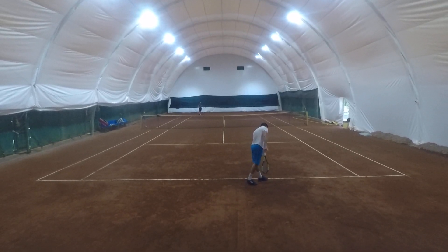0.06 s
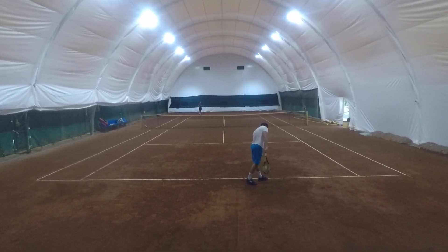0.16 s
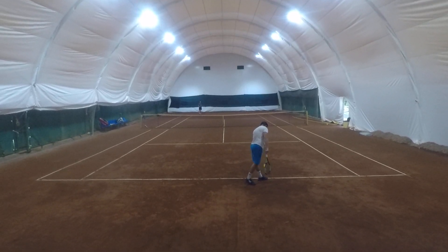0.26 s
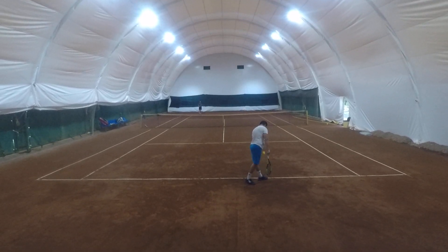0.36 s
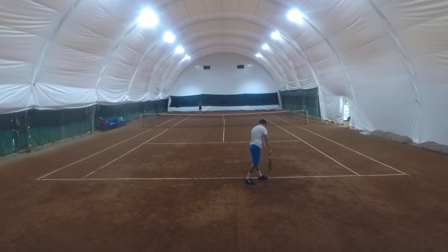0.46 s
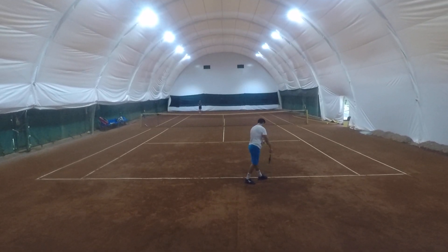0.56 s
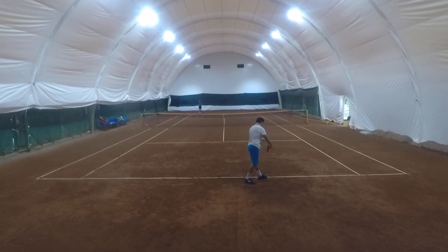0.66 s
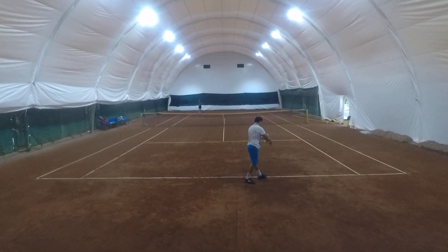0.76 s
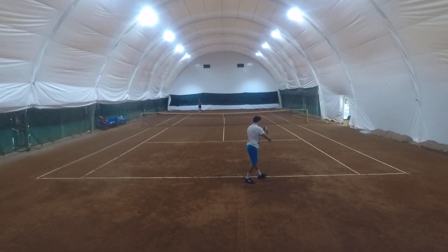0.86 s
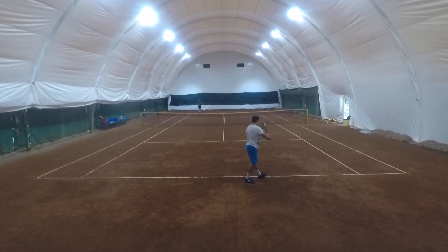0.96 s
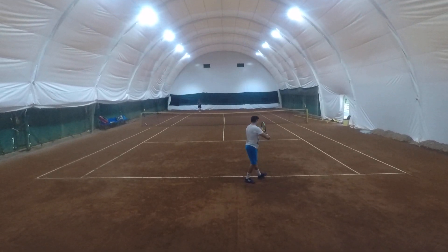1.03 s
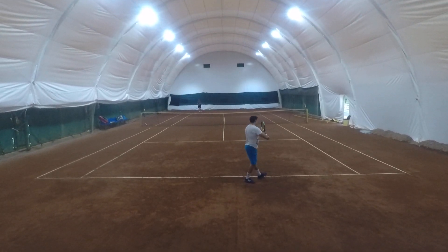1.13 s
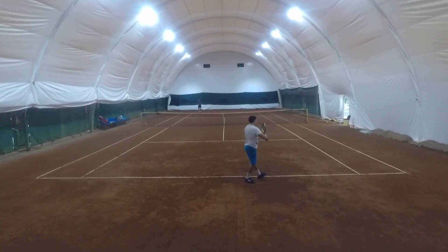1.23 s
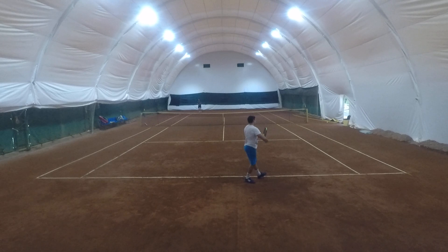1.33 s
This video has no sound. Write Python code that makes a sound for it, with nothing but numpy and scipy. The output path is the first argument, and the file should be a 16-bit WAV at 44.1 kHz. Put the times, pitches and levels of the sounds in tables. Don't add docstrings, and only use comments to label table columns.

```python
import sys
import numpy as np
from scipy import signal
from scipy.fft import rfft, irfft, next_fast_len
from scipy.io import wavfile
from scipy.ndimage import uniform_filter1d, map_coordinates

SR = 44100
rng = np.random.default_rng(int(sys.argv[2]) if len(sys.argv) > 2 else 0)


def wav_out(sig):
    wavfile.write(sys.argv[1], SR, np.round(np.clip(np.atleast_2d(sig).T, -1, 1) * 32767).astype(np.int16))


def gain_from_db(level_db):
    decades = np.asarray(level_db, float) / 20
    return 10 ** decades


N = 61740

# t/s, level/dB
HALL_RUSH_LEVEL = [
    (0.0, -40.5),
    (0.526, -40),
    (0.954, -44),
    (1.4, -49.5),
]
# f/Hz, level/dB
RUSH_MID = [(59, -37), (100, -42), (119, -4.5), (237, -1.5), (260, -6.5), (299, -7), (657, -16.5),
            (1040, -8), (4000, -38.5), (5200, -52), (8800, -120)]
RUSH_SIDE = [(59, -49), (100, -8), (124, -11.5), (230, -4.5), (468, -15), (521, -6.5), (699, -15),
             (1010, -7), (4000, -43.5), (5200, -74), (8800, -120)]
# f/Hz, level/dB
HISS_SPECTRUM = [(1470, -27), (2500, -2.5), (4400, -8.5), (4600, -5.5), (5870, -3.5), (6470, -2.5),
                 (8710, -4.5), (13800, -16.5), (14800, -43)]
# f/Hz, level/dB
RUMBLE_SPECTRUM = [(15, -4.5), (40, -4), (70, -7.5), (100, -11.5), (130, -41)]
# t/s, level/dB
WIND_FILTER = [
    (0, 19),
    (.04, -25),
    (.49, -24),
    (.56, -1),
    (.64, 12.5),
    (.75, 13),
]
# t/s, length/s, level/dB, boom/dB, brightness/dB
ECHO_GROUPS = [(0.176, 0.024, -39.5, 2.5, -1), (0.262, 0.013, -42.5, 7.5, 9), (0.303, 0.032, -36, 12, 9),
               (0.342, 0.023, -32.5, 1, 1.5), (0.361, 0.018, -32, 6.5, 3), (0.376, .014, -38, -7, 5),
               (0.415, 0.011, -31.5, 12, 2.5), (0.437, 0.031, -33, 2.5, 3.5),
               (0.499, 0.015, -34.5, 9.5, 9.5), (0.512, 0.021, -33.5, 3, -5),
               (0.523, 0.014, -23, 9.5, 10.5), (0.549, 0.015, -27.5, 3, 3), (0.57, 0.011, -28, 3, 10.5),
               (0.587, 0.013, -32.5, -9, 7), (0.614, 0.031, -33.5, 7.5, 6.5), (0.649, 0.02, -33, 3, 3),
               (0.679, 0.009, -37, 8, 0), (0.712, 0.026, -41, 8.5, 6.5), (0.738, 0.024, -42, 6.5, 7.5),
               (0.786, 0.017, -44.5, 8, 4.5), (0.823, 0.042, -44.5, 7, 4), (0.933, 0.089, -64, 16.5, 16)]
# f/Hz, width/Hz
RACKET_MODES = [(440, 24), (500, 5.3), (540, 3.3), (985, 69), (1165, 35), (1440, 160), (1525, 17),
                (2270, 220), (2450, 75), (3090, 140), (6200, 740)]
# f/Hz, level/dB
CRACK_MID = [(150, -35), (250, -13.5), (443, 0.5), (747, -15.5), (1470, -19.5), (2430, -27), (4680, -38.5),
             (6450, -44), (14000, -50)]
CRACK_SIDE = [(150, -32.5), (250, 5), (311, -8), (436, -1.5), (642, -4.5), (1370, -15.5), (3340, -43.5),
              (5930, -50), (14000, -60)]
# f/Hz, width/Hz, level/dB
BOOM_MODES = [(154.3, 37, 6), (223, 130, -9.5), (230, 8, -31)]
# f/Hz, level/dB
ECHO_BALANCE = [(60, -19), (150, 4), (350, 6), (700, 4.5), (1300, -2), (2400, 3), (5000, -2.5), (9000, -4)]
# t/s, peak level/dB, left-right level/dB
TICKS = [
    (0.196, -34.5, 5),
    (.301, -30, -10),
    (0.4988, -42.5, -20),
    (1.024, -42, -7),
    (1.1671, -28, -6),
]
# f/Hz, level/dB, t60/s
SHELL_MODES = [(2790, -3, 0.008), (3500, -3, 0.004), (4270, -1, .003), (5300, 0, 0.004), (6260, 1.5, 0.008),
               (7000, -2, 0.004)]
# t/s, crack level/dB, thump level/dB, left-right level/dB, share from the side (0-1)
EARLY_PATHS = [(0.2405, -27, -21, -2.5, 0), (0.264, -28, -46, 0, 0.26), (0.2684, -21.5, -38, -5, 0.1),
               (0.2698, -19, -32, 2, 0.65), (0.2735, -18, -39, -4, 0.94), (0.2801, -20.5, -35, 2, 0.4),
               (0.2832, -19, -32, -2, 0.38), (.3012, -25, -31, 4, 0.26), (0.311, -20, -46, 10, 1),
               (.425, -20, -18, 6, 0.53), (0.447, -17, -25.5, -2, 0.95), (0.4584, -24, -53, 6, .8),
               (.465, -21, -26.5, 4, 0.33), (0.517, -28, -31, 4, 1), (0.527, -21, -53, -7, 0.77),
               (0.53, -25, -30, 1, .8), (0.535, -22, -22.5, -5, .5)]
# f/Hz, width/Hz, level/dB
FRAME_MODES = [(1010, 270, 4.5), (1770, 590, 0), (2600, 890, -1.5)]
# t/s, f/Hz, peak level/dB, t60/s, left-right level/dB
FOCUSED_RINGS = [(0.2417, 1100, -18.5, 0.0065, -16), (.2657, 1350, -12.5, 0.0057, 0),
                 (.2686, 1730, -22.5, 0.0064, 1), (.2815, 1010, -15, 0.0046, -13),
                 (0.3006, 2400, -20, 0.0082, 6), (0.4268, 320, -19, 0.03, 4), (0.5337, 444, -13, 0.012, 12),
                 (.345, 259, -22, 0.054, 3), (.2695, 1050, -20, 0.017, -6), (.2415, 1900, -20, 0.0053, 0),
                 (.529, 12000, -55, 0.017, 0), (0.313, 1540, -29.5, .012, 3), (0.354, 1400, -33, 0.011, 0),
                 (0.364, 3220, -33.5, 0.01, -3), (0.379, 2480, -33, 0.013, -3),
                 (.390, 3080, -34, 0.011, -4), (0.414, 970, -26, 0.033, 0), (0.4242, 3060, -30, 0.014, 2),
                 (0.4561, 3020, -30, 0.013, 1), (0.5143, 527, -14.5, 0.025, 10), (.515, 3800, -35, .012, 3),
                 (.526, 2340, -25.5, 0.029, 9), (0.529, 1501, -21, 0.044, -5), (.531, 3170, -29, .015, -2),
                 (.532, 7250, -34.5, 0.013, -5), (.533, 9400, -41.5, 0.014, 0),
                 (.5355, 6530, -34, 0.015, 0), (0.5368, 3185, -28, 0.029, -3),
                 (0.5378, 1445, -17, 0.034, -3), (0.5414, 2420, -24, 0.015, 0),
                 (.578, 6300, -46, 0.018, -2), (0.582, 2500, -31, .012, 4), (.599, 6760, -40, .015, -8),
                 (.608, 440, -27, .04, 9), (0.6224, 2540, -29.5, 0.013, 6), (0.642, 2480, -36, .015, 3),
                 (0.656, 2310, -41, 0.01, 0), (0.69, 1080, -25.5, 0.016, 0), (.7653, 2500, -39, 0.02, 6)]


def unit(x):
    return x / np.sqrt(np.mean(x ** 2) + 1e-20)


def along(points, hz):
    f, level_db = np.transpose(points)
    return gain_from_db(np.interp(np.log(hz + 1), np.log(f + 1), level_db))


def curves(rows):
    t, *columns = np.transpose(rows)
    return [np.interp(np.arange(N) / SR, t, column) for column in columns]


def wobble(rate):
    knots = rng.standard_normal(int(N * rate / SR) + 4)
    return map_coordinates(knots, [np.arange(N) * rate / SR])


def filtered(x, response):
    m = 2 * next_fast_len(N // 2 + SR // 8)
    return irfft(rfft(x, m) * response(np.fft.rfftfreq(m, 1 / SR)), m)[..., :N]


def causal(gain):
    cepstrum = irfft(np.log(gain + 1e-6))
    half = len(cepstrum) // 2
    cepstrum[1:half] *= 2
    cepstrum[half + 1:] = 0
    return np.exp(rfft(cepstrum))


def ringing(modes, f):
    total = 0
    for k, (centre, width, db) in enumerate(modes):
        resonance = 1j * f * width / (centre * centre - f * f + 1j * f * width)
        total = total + (-1) ** k * gain_from_db(db) * resonance
    return total


def ports(mid, side):
    return np.array([mid + side, mid - side])


def pan(db):
    return gain_from_db(np.array([[db], [-db]]) / 2)


def hall_rush():
    level_db, = curves(HALL_RUSH_LEVEL)
    side_db, gain_db, low_growth = -0.5, 2, 0.94
    colour = lambda f: [along(RUSH_MID, f), gain_from_db(side_db) * along(RUSH_SIDE, f)]
    rush = filtered(rng.standard_normal((2, N)), colour)
    lows = filtered(rush, lambda f: 1 / (1 + (f / 500) ** 4))
    swell_db = (low_growth - 1) * (level_db - level_db[-1])
    moving_lows = lows * gain_from_db(swell_db + 1.6 * wobble(25.1))
    moving_highs = (rush - lows) * gain_from_db(1.54 * wobble(29.67))
    return ports(*(gain_from_db(level_db + gain_db) * (moving_lows + moving_highs) / np.std(rush[0])))


def hiss():
    noise = filtered(rng.standard_normal((2, N)), lambda f: along(HISS_SPECTRUM, f))
    return gain_from_db(-60) * pan(-2.5) * unit(noise)


def rumble():
    level_db, side_db, lump_db, lumps_per_s = -61.5, -14, 2, 16
    deep = lambda f: along(RUMBLE_SPECTRUM, f) * gain_from_db(-3 * np.clip(f - 130, 0, 30))
    steady = filtered(rng.standard_normal(N), deep)
    lumps = gain_from_db(lump_db * wobble(lumps_per_s)) * rng.standard_normal((2, N)) * gain_from_db([[0], [side_db]])
    return ports(*(gain_from_db(level_db) * filtered(lumps, deep) / np.std(steady)))


def frame_whine():
    frame_s, first_s, whine_s, ramp_s = 1.001 / 30, 0.008, 0.0045, 0.00034
    f_hz, level_db = 8520, -58
    t = np.arange(N) / SR
    since = (t - first_s) % frame_s
    gate = np.clip(np.minimum(since, whine_s - since) / ramp_s, 0, 1)
    return gain_from_db(level_db + 0.78 * wobble(21.0)) * gate * np.sin(2 * np.pi * f_hz * t)


def groups():
    rise_s, fall_t60_s = 0.0069, 0.063
    tail_s, tail_db, tail_t60_s, tail_bright_db, tail_boom_db = 0.3, -40, 0.88, -0.49, 2.5
    t = np.arange(N) / SR
    s, length, db, boom_db, bright_db = np.transpose(ECHO_GROUPS)[..., None]
    fall_db = -60 * np.clip(t - s - length, 0, 1) / fall_t60_s
    shape = np.clip((t - s) / rise_s, 0, 1) * gain_from_db(db + fall_db)
    tail = (t > tail_s) * gain_from_db(tail_db - 60 * (t - tail_s) / tail_t60_s)

    def total(extra_db, extra_tail_db):
        power = np.sum((shape * gain_from_db(extra_db)) ** 2, axis=0)
        return np.sqrt(power + (tail * gain_from_db(extra_tail_db)) ** 2)

    return total(0, 0), total(bright_db, tail_bright_db), total(boom_db, tail_boom_db)


def struck_ball(spectrum, f):
    ring_db = 8.5
    boost = sum(np.abs(ringing([(centre, width, ring_db)], f)) ** 2 for centre, width in RACKET_MODES)
    return causal(along(spectrum, f) * np.sqrt(1 + boost))


def echo_crack(dull_level, bright_level):
    echoes_per_s, spread_db, side_db = 5000, 3.5, 7.5
    bright_hz, air_hz = 2120, 9200
    chance, sign, size = rng.random((3, 2, N))
    pulses = (chance < echoes_per_s / SR) * np.sign(sign - 0.5) * gain_from_db(-spread_db * np.log(size + 0.065))

    def colour(f):
        both = np.array([struck_ball(CRACK_MID, f), gain_from_db(side_db) * struck_ball(CRACK_SIDE, f)])
        return both / (1 + (f / air_hz) ** 14)

    dull = lambda f: 1 / (1 + (f / bright_hz) ** 4)
    dull_part = filtered(pulses * dull_level, dull)
    flutter = gain_from_db(1.76 * wobble(200))
    bright_part = filtered(pulses * bright_level * flutter, lambda f: 1 - dull(f))
    return filtered(dull_part + bright_part, colour) / np.std(filtered(pulses, colour)[0])


def echo_boom(boom_level):
    f_hz, wander_rad, side_lag_rad = 147.46, 0.45, 1.63
    noise_db, level_db, side_db = -9.5 + 26.5, -2, 1

    def low(f):
        highpass = (1j * f / (110 + 1j * f)) ** 3
        return ringing(BOOM_MODES, f) * highpass / (1 + (f / 420) ** 4)

    phase = 2 * np.pi * f_hz * np.arange(N) / SR + wander_rad * wobble(20)
    side_phase = np.array([[0], [side_lag_rad]]) + np.array([[0], [0.6]]) * wobble(9.2)
    note = np.sin(phase + side_phase)
    push = (note + gain_from_db(noise_db) * rng.standard_normal((2, N))) * gain_from_db([[0], [side_db]])
    return filtered(push * boom_level * gain_from_db(level_db), low) / np.std(filtered(push, low)[0])


def swarm():
    dull_level, bright_level, boom_level = groups()
    echoes = ports(*(echo_crack(dull_level, bright_level) + echo_boom(boom_level)))
    return filtered(echoes, lambda f: [along(ECHO_BALANCE, f) ** 0.5, along(ECHO_BALANCE, f) ** -0.5])


def ticks():
    snap_db, snap_t60_s, snap_top_hz = 4, 0.0018, 10800
    out, t = np.zeros((2, N + SR)), np.arange(SR // 20) / SR
    for s, db, pan_db in TICKS:
        ring = np.zeros((2, len(t)))
        for port in ring:
            for hz, level, t60 in SHELL_MODES:
                envelope = gain_from_db(level - 60 * t / t60) * (1 - np.exp(-t / 0.0001))
                port += envelope * np.sin(2 * np.pi * (hz * t + 0.51 * rng.random()))
        noise = uniform_filter1d(rng.standard_normal((2, len(t) + 1)), size=3, axis=1)
        snap = gain_from_db(snap_db - 60 * t / snap_t60_s) * np.diff(noise)
        out[:, round(s * SR):][:, :len(t)] += gain_from_db(db - 8.5) * pan(pan_db) * (ring + snap)
    return 2 * filtered(out[:, :N], lambda f: 1 / (1 + 1j * f / snap_top_hz) ** 2)


def paths():
    thump_hz, thump_width_hz, thump_lag_s = 228, 59, 0.00184
    knock_top_hz, first_top_hz = 3430, 2100
    first, cracks, thumps = np.zeros((3, 2, N))
    for k, (s, crack_db, thump_db, pan_db, share) in enumerate(EARLY_PATHS):
        sides = pan(pan_db)[:, 0] * [1, np.cos(np.pi * share)]
        arrivals = first if k == 0 else cracks
        arrivals[:, round(s * SR)] += gain_from_db(crack_db) * sides
        thumps[:, round((s + thump_lag_s) * SR)] -= gain_from_db(thump_db) * pan(pan_db / 2)[:, 0]

    def sharp(f):
        return ringing(FRAME_MODES, f) / (1 + 1j * f / knock_top_hz) ** 4

    def bent(f):
        return sharp(f) * causal(1 / (1 + (f / first_top_hz) ** 6))

    def soft(f):
        highpass = (1j * f / (150 + 1j * f)) ** 2
        return ringing([(thump_hz, thump_width_hz, 0)], f) / (1 + 1j * f / 500) ** 2 * highpass

    impulse, out = np.zeros(N), np.zeros((2, N))
    impulse[0] = 1
    for arrivals, response in ((cracks, sharp), (first, bent), (thumps, soft)):
        out += filtered(arrivals, response) / np.abs(filtered(impulse, response)).max()
    return out


def rings():
    rise_s = 0.0004
    out, t = np.zeros((2, N + SR)), np.arange(SR // 10) / SR
    for s, hz, db, t60, pan_db in FOCUSED_RINGS:
        note = gain_from_db(db - 60 * t / t60) * (1 - np.exp(-t / rise_s)) * np.sin(2 * np.pi * hz * t)
        out[:, round(s * SR):][:, :len(t)] += pan(pan_db) * note
    return out[:, :N]


def jolt():
    start_s, level_db, f_hz, t60_s, rise_s = 1.1, -37.5, 84.5, 0.03, 0.002
    t = np.clip(np.arange(N) / SR - start_s, 0, 1)
    return gain_from_db(level_db - 60 * t / t60_s) * np.sin(2 * np.pi * f_hz * t) * (1 - np.exp(-t / rise_s))


def scene():
    background = hall_rush() + hiss() + rumble()
    camera = frame_whine() + ticks() + jolt()
    blow = swarm() + paths() + rings()
    return background + camera + blow


def roll_off(x):
    return signal.sosfilt(signal.butter(12, 14910, fs=SR, output="sos"), x)


def record(dry):
    wind_hz, top_hz = 118, 14800
    notch_hz, notch_width_hz, notch_depth = 740, 85, 0.62
    open_db, = curves(WIND_FILTER)
    lows = filtered(dry, lambda f: 1 / (1 + (f / wind_hz) ** 14))
    dip = lambda f: notch_depth * np.exp(-2 * ((f - notch_hz) / notch_width_hz) ** 2)
    notch = filtered(dry.mean(axis=0), dip)
    mix = filtered(dry - notch - lows * (1 - gain_from_db(open_db)), lambda f: 1 / (1 + (f / top_hz) ** 40))
    return roll_off(mix)


dry = scene()
out = record(dry)
wav_out(out)
```